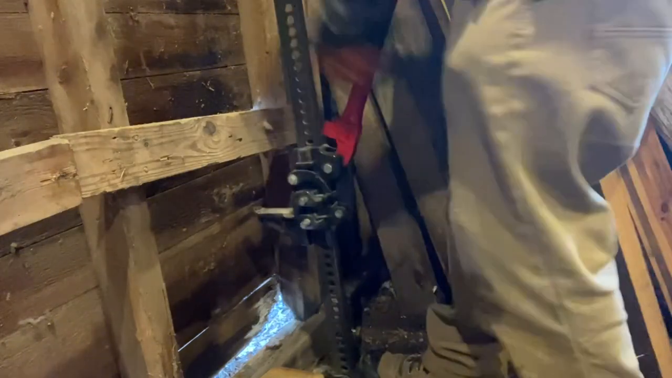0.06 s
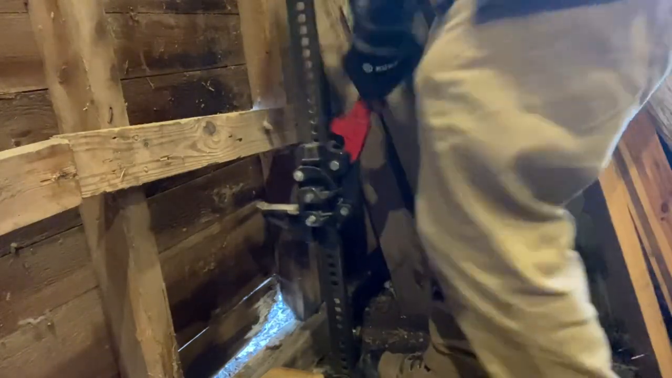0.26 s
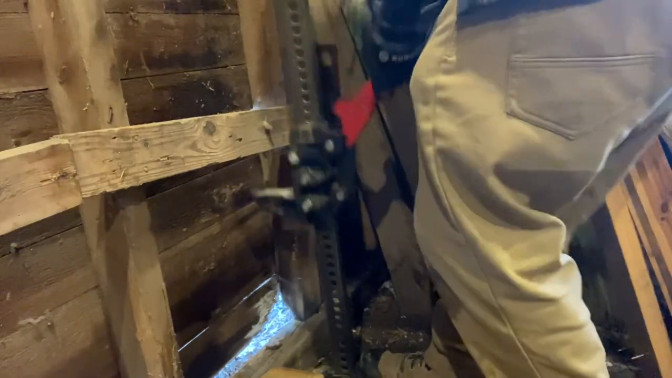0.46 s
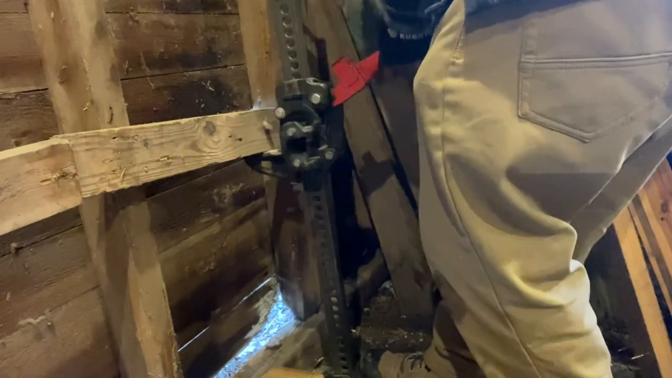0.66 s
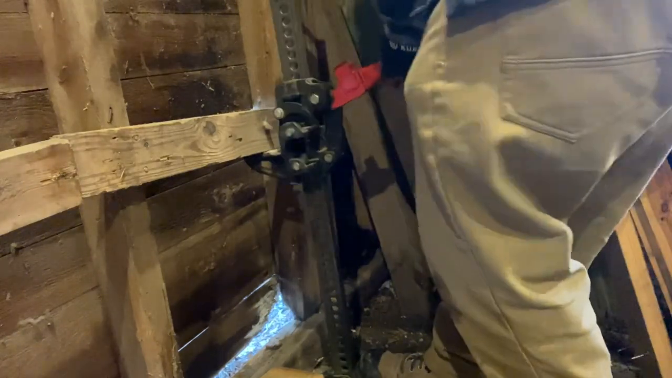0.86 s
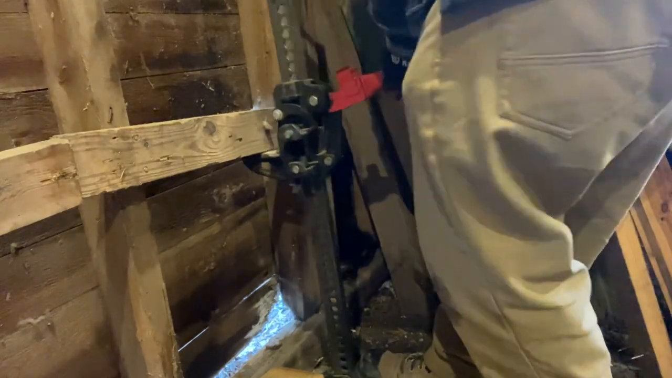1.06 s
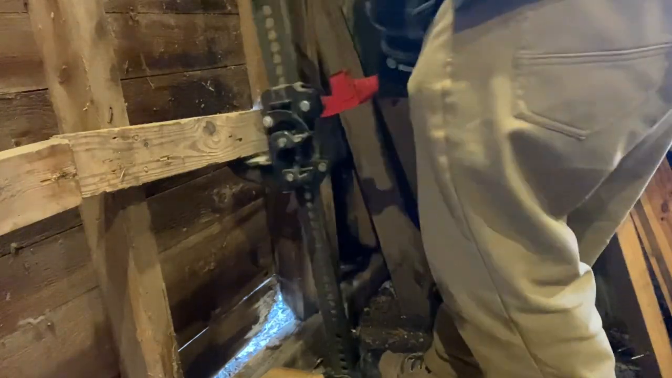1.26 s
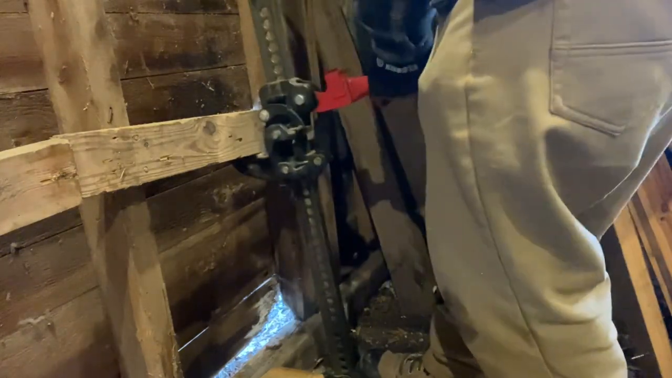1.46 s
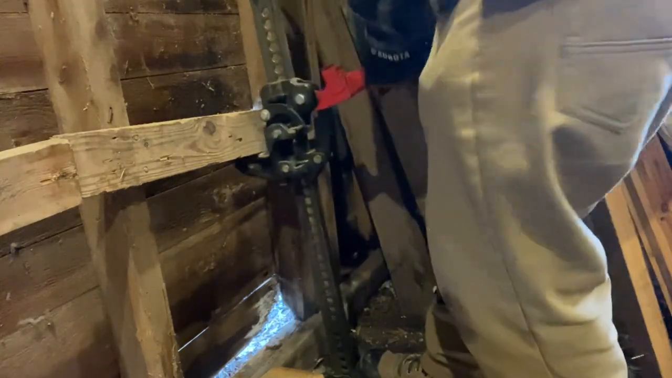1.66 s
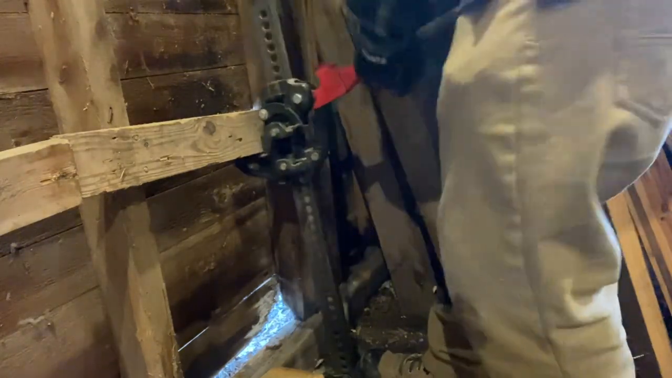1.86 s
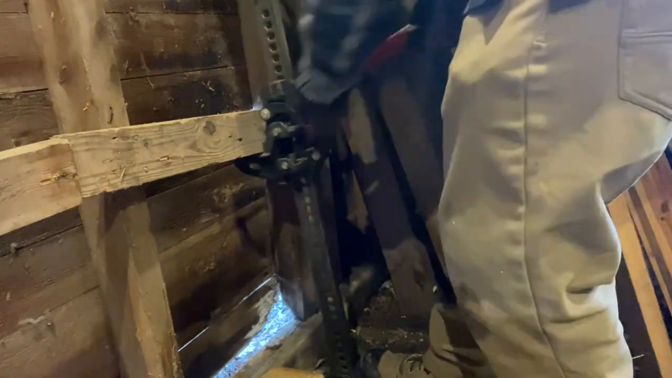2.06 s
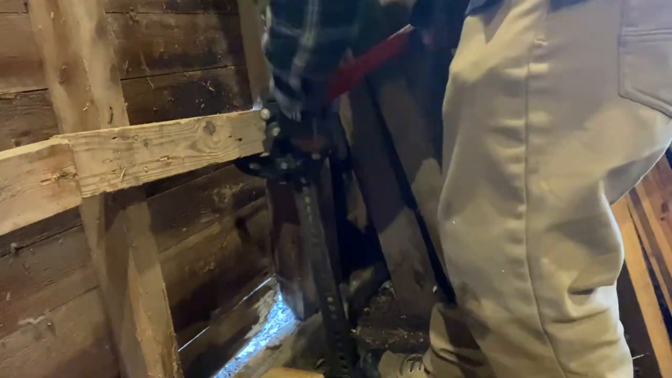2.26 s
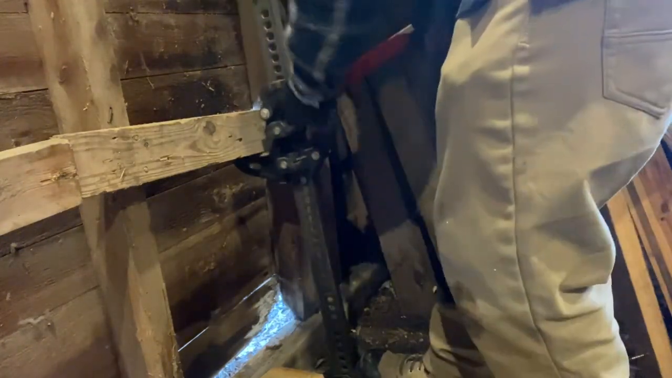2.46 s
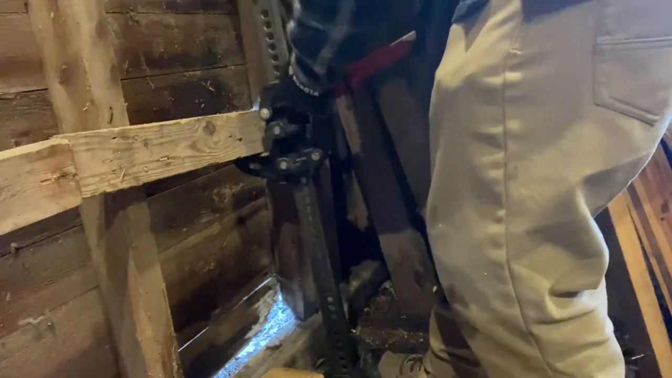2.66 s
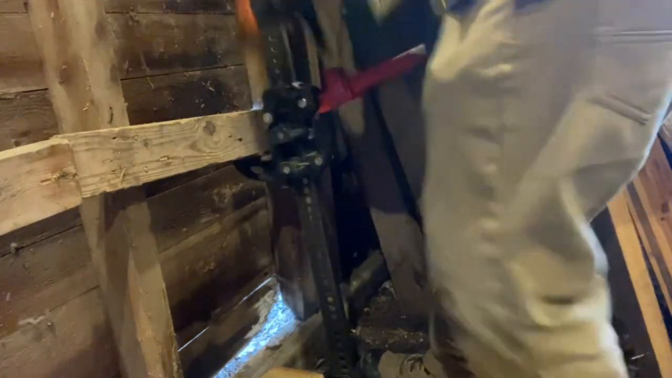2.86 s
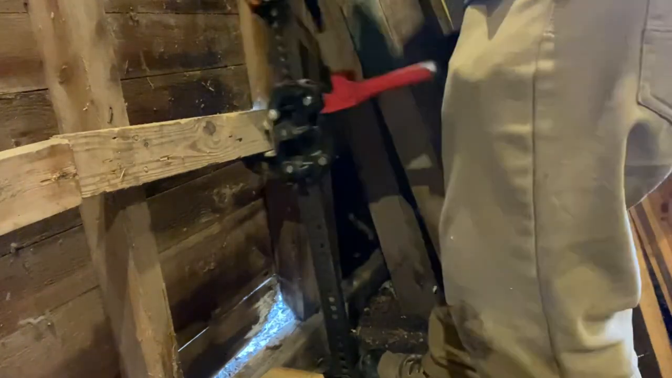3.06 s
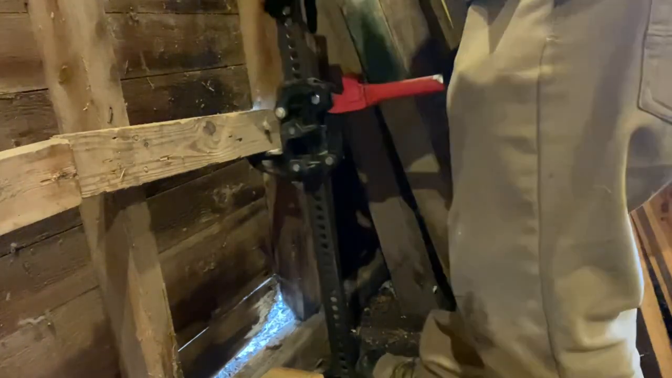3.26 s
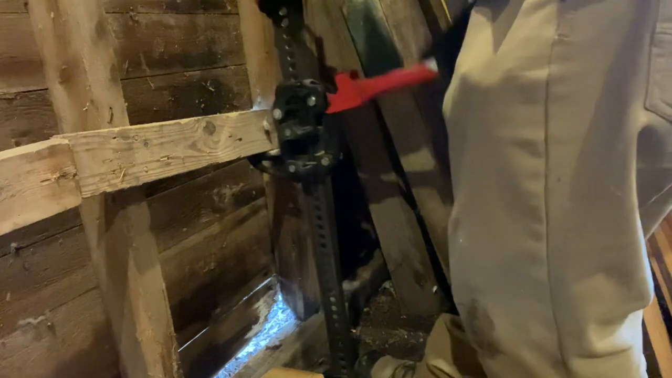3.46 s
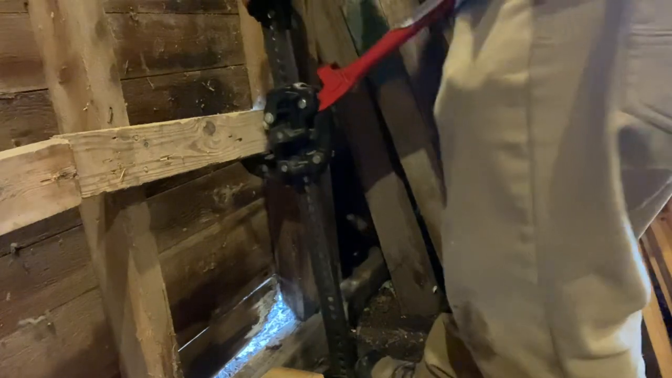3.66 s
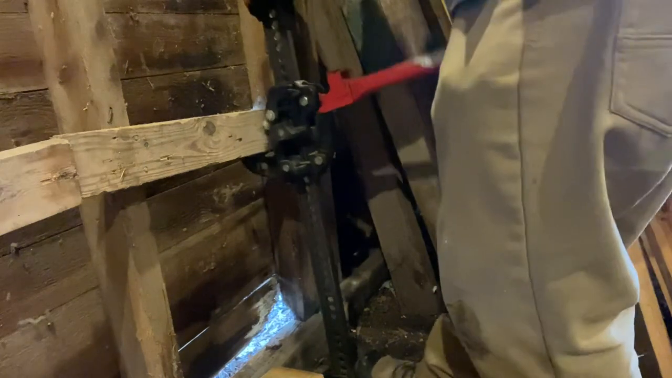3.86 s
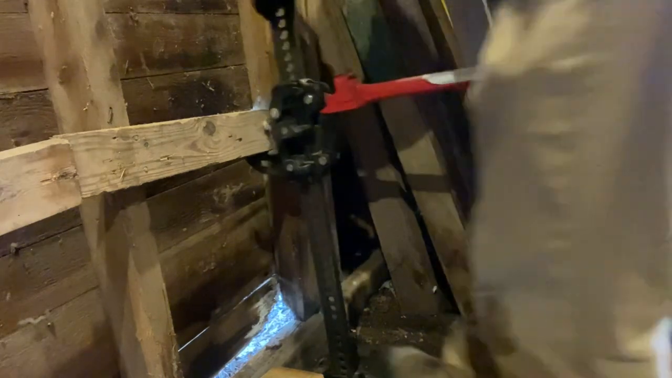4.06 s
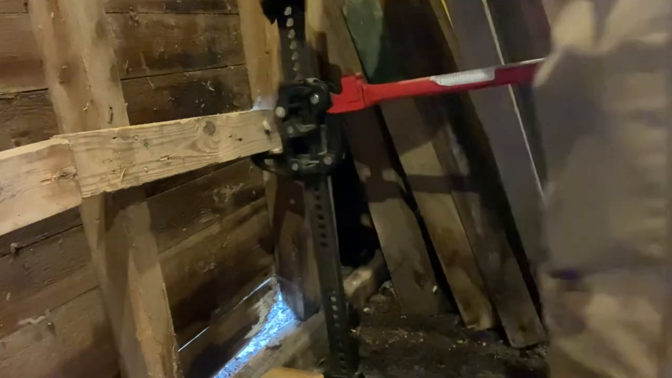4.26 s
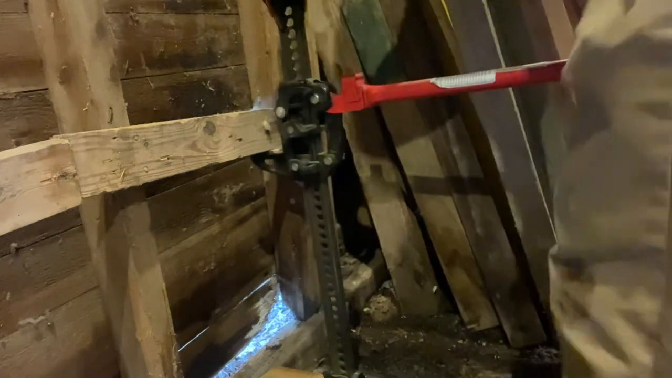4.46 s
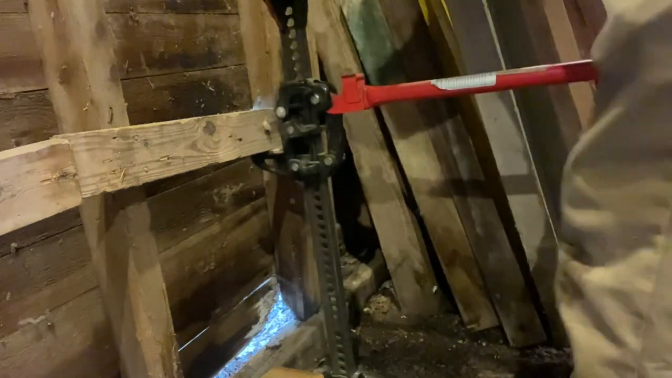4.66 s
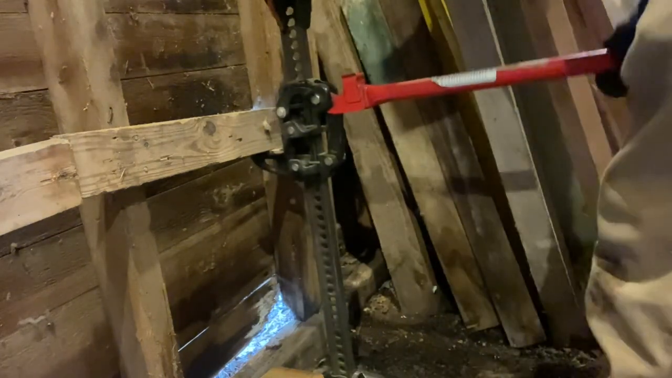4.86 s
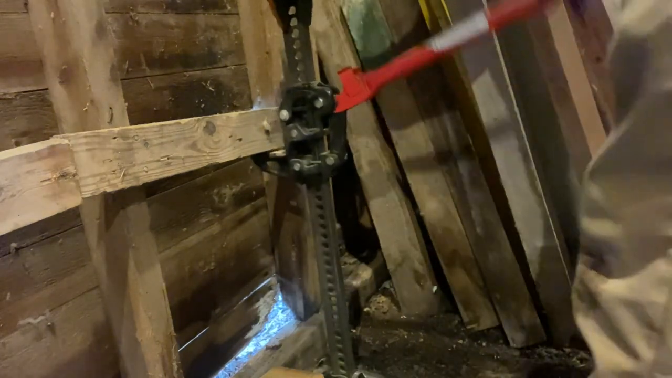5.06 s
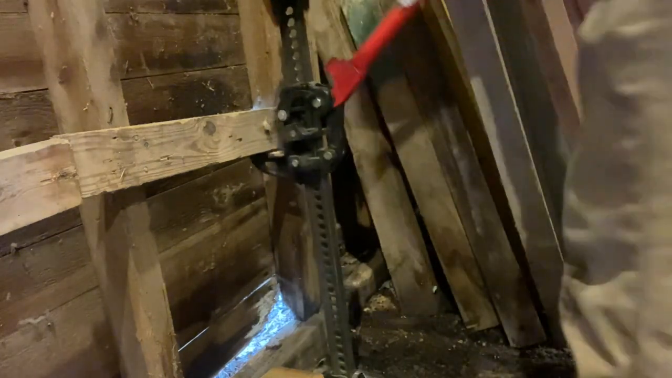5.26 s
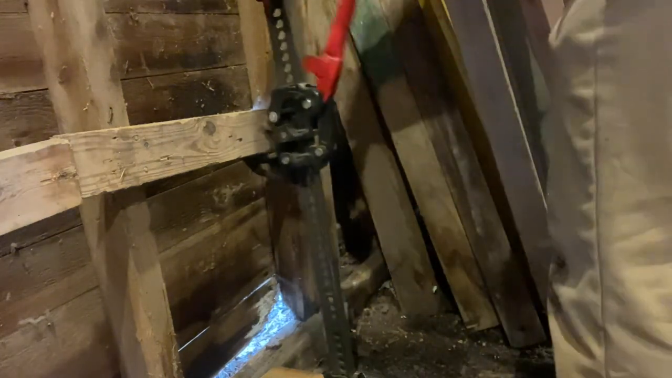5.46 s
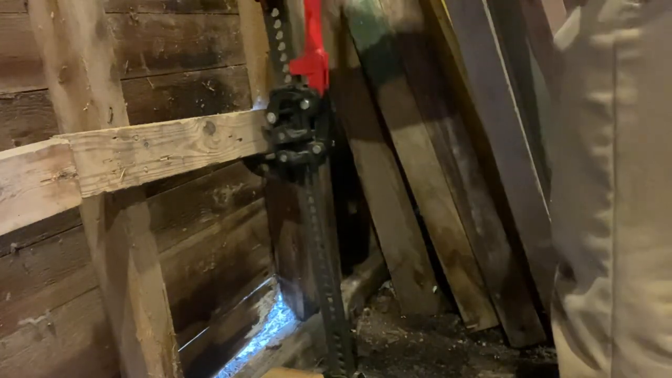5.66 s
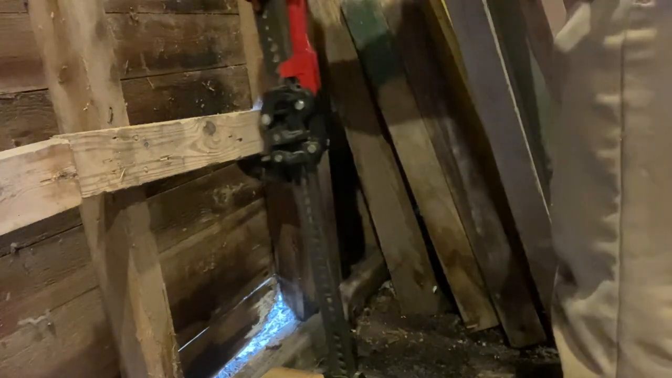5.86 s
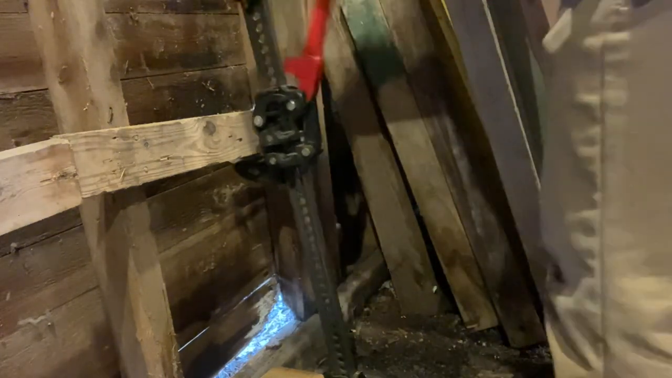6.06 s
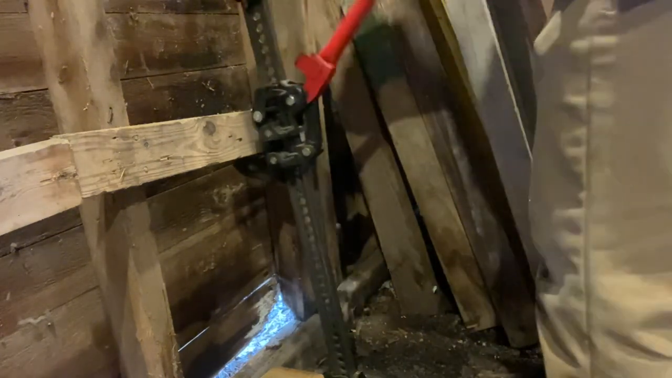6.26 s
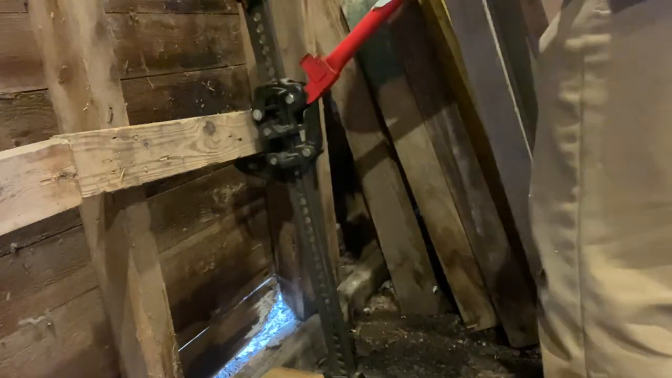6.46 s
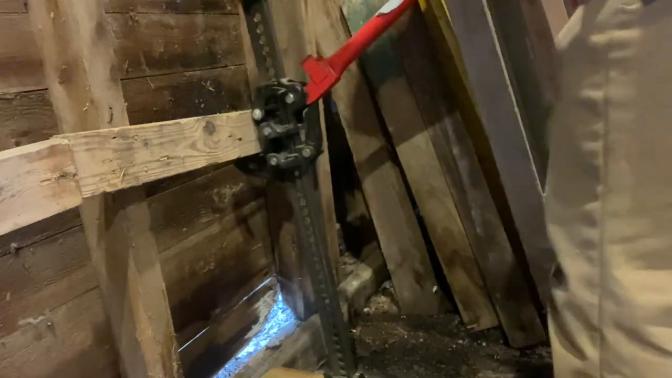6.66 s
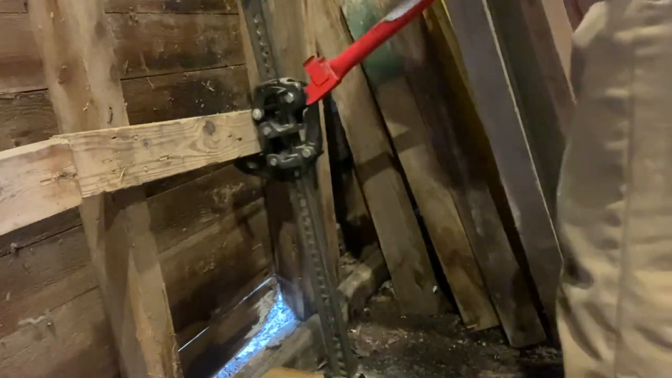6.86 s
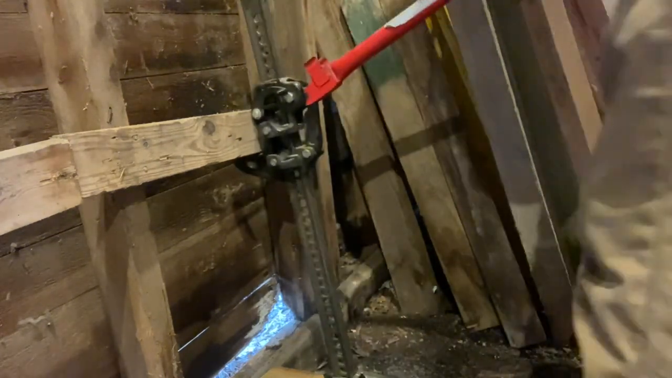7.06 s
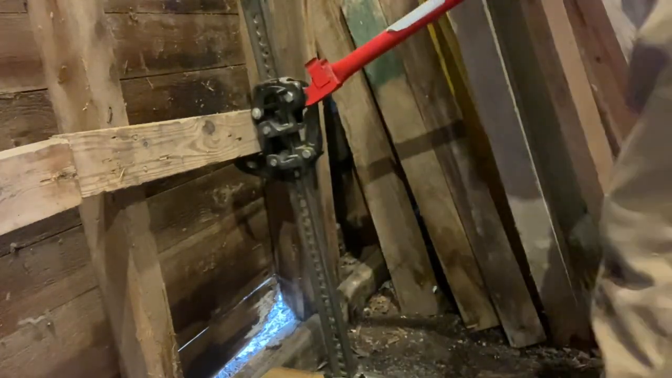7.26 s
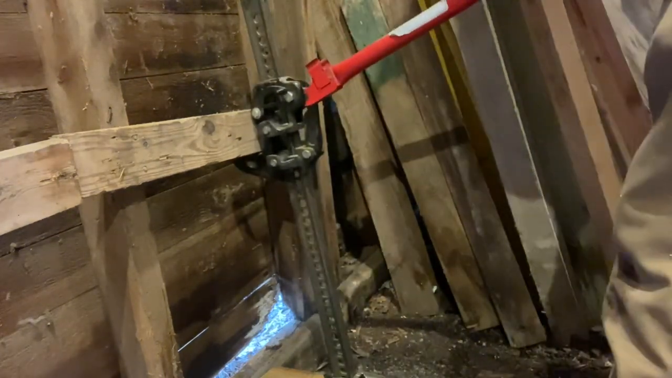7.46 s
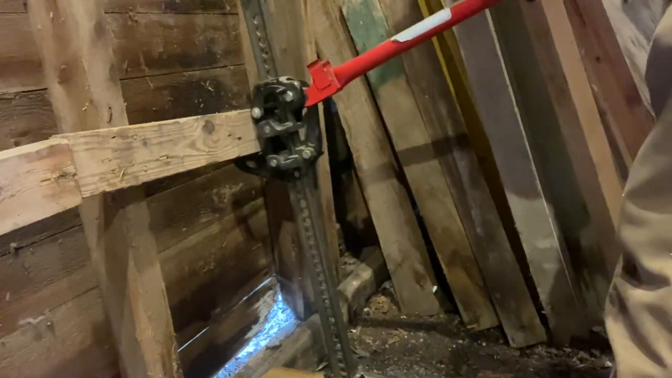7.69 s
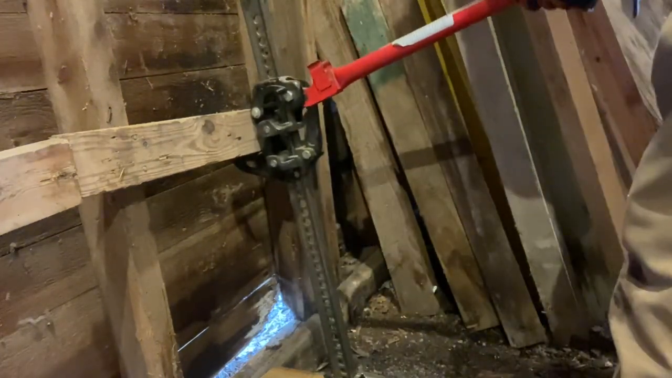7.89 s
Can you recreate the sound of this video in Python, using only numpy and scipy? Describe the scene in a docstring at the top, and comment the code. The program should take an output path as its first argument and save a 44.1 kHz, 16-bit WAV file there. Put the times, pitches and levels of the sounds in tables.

```python
"""A farm jack is worked against a beam in an old timber barn, close to the microphone.
Over a low drone and the stir of clothes, knocks, rattle and clacks lead into hard steel blows and a thump on the
planks within the first second; a pin pings. Later come a second, shorter ping, more clacks, creaking timber and
scuffs, a hum that swells midway, more blows and the last clanks. Steel and wood are shaped noise bursts with
dying sines, rubbing is grainy noise, the floor is sines and low noise, and the barn adds a short noise tail."""
import sys
import numpy as np
from scipy import signal
from scipy.fft import irfft
from scipy.io import wavfile
from scipy.ndimage import uniform_filter1d

SR = 44100
rng = np.random.default_rng(int(sys.argv[2]) if len(sys.argv) > 2 else 0)


def persist_wave(psi):
    """Save psi, clipped to +-1, as 16-bit WAV."""
    counts = np.round(np.clip(psi, -1, 1) * 32767).astype(np.int16)
    wavfile.write(sys.argv[1], SR, np.atleast_2d(counts).T)


N = 349713  # length in samples


def amp(db):
    """Decibels to amplitude."""
    return np.exp(np.asarray(db) * np.log(10) / 20)


def evened(x):
    """Scales a sound to an RMS of 1."""
    return x / np.sqrt(np.mean(x ** 2) + 1e-20)


def read(points, hz):
    """Reads a curve of (Hz, value) points along a logarithmic pitch axis."""
    f, value = np.transpose(points)
    return np.interp(np.log(hz + 1), np.log(f + 1), value)


def glide(points, t):
    """Reads a curve of (seconds, value) points over time."""
    return np.interp(t, *np.transpose(points))


def swell_in(t, rise_s):
    """A soft onset that closes in on full level."""
    return 1 - np.exp(-t / rise_s)


def add(mix, s, sound):
    """Lays a sound into the mix from second s, cut off at the end of the mix."""
    part = mix[:, max(round(s * SR), 0):][:, :sound.shape[-1]]
    part += sound[..., :part.shape[1]]


def bandpass(x, lo_hz, hi_hz, order=3):
    """Keeps the band between two frequencies."""
    edges = [lo_hz, min(hi_hz, SR / 2 - 1)]
    return signal.sosfilt(signal.butter(order, edges, "band", fs=SR, output="sos"), x)


def colour(x, points):
    """Causal filter with the given spectrum, so that attacks stay sharp."""
    hz = abs(np.fft.fftfreq(4096, 1 / SR))
    log_gain = np.log(amp(read(points, hz)))
    taps = np.fft.ifft(np.exp(np.conj(signal.hilbert(log_gain)))).real
    return signal.oaconvolve(x, taps[None, :len(hz) // 2], axes=1)[:, :N]


# How alike left and right are. Each row: frequency in Hz, likeness (1 is identical).
LIKENESS = [(60, 0.94), (150, 1), (500, 0.24), (1100, 0.44), (2200, 0.41), (4000, .15), (8000, 0.13),
            (13000, 0.29)]


def noise(size, spectrum=((1, 0), (2, 0))):
    """Two channels of noise, nearly alike in the bass and looser above; flat unless given a spectrum."""
    hz = np.fft.rfftfreq(size, 1 / SR)
    mid, side = np.exp(2j * np.pi * rng.random((2, len(hz))))
    same = np.clip(read(LIKENESS, hz), -1, 1)
    mid, side = mid * np.sqrt(1 + same), side * np.sqrt(1 - same)
    return evened(irfft(np.array([mid + side, mid - side]) * amp(read(spectrum, hz)), size))


def ring(modes, t):
    """Dying sines from (Hz, dB, t60 s); the less alike the channels at a pitch, the wider their phases part."""
    def mode(hz):
        angle = np.arccos(np.clip(read(LIKENESS, hz), -1, 1))
        apart = angle * np.array([[.5], [-.5]]) * rng.choice([-1, 1])
        return np.sin(2 * np.pi * (hz * t + rng.random()) + apart)
    return sum(amp(db - 60 * t / t60) * mode(hz) for hz, db, t60 in modes)


def centred(x, side_db):
    """Sets the level of the left-right difference: below 0 dB draws in, above 0 dB widens."""
    mid = x.mean(0)
    return mid + amp(side_db) * (x - mid)


# Low, middle, high and top band of a blow. Each row: lower edge in Hz, upper edge in Hz.
BAND_EDGES = [(180, 700), (700, 3000), (3000, 9000), (9000, 14300)]


def blows(rows, band_db, band_decay, band_rise_s, band_side_db):
    """Each contact is a chatter of tiny collisions in four bands, each with its own swell, decay and width."""
    out, t = np.zeros((2, N)), np.arange(8192) / SR
    bands = [signal.butter(3, edges, "band", fs=SR, output="sos") for edges in BAND_EDGES]
    for s, db, low_db, high_db, top_db, t60 in rows:
        unevenness = evened(uniform_filter1d(rng.standard_normal(len(t)), size=40))
        chatter = noise(len(t)) * amp(1.4 * unevenness)
        levels_db = np.add([low_db, 0, high_db, top_db], band_db)
        for band, level_db, decay, rise, side_db in zip(bands, levels_db, band_decay, band_rise_s, band_side_db):
            fade = amp(-60 * t / max(t60 * decay, 1 / SR))
            shape = fade * (1 - np.exp(-(t / rise) ** 2)) + 1e-9
            crack = evened(signal.sosfilt(band, centred(chatter, side_db) * shape))
            crack = crack * np.sqrt(np.mean(shape ** 2)) / shape.max()  # a longer shape carries more energy
            add(out, s, amp(db + level_db) * crack)
    return out


def tick(note_hz):
    """One dry, woody contact: a short noise burst around its own note, with a peak of 1."""
    t = np.arange(2048) / SR
    burst = noise(len(t)) * amp(-60 * t / 0.016) * swell_in(t, 0.00053)
    contact = bandpass(burst, .6 * note_hz, 1.5 * note_hz)
    return contact / abs(contact).max()


# The faint hum before its swell. Each row: pitch in Hz, level in dB.
HUM = [(97, -53.5)]
# The hum grows louder. Each row: time in seconds, gain in dB.
HUM_SWELL = [(4.4, -6.5), (5.4, 4)]
# Spectrum of the drone. Each row: frequency in Hz, relative level in dB.
DRONE = [(12, -27.5), (25, -12), (40, -8.5), (55, -2), (75, 0), (100, 1), (150, -13.5), (250, -20),
         (500, -32.5), (900, -70.5)]
DRONE_DB = -51.5


def rumble():
    """The low drone of the building as bass noise, with a faint sine hum in it."""
    t = np.arange(N) / SR
    hum = sum(amp(db) * np.sin(2 * np.pi * hz * t) for hz, db in HUM)
    return amp(glide(HUM_SWELL, t)) * hum + amp(DRONE_DB) * noise(N, DRONE)


# The light stir of clothes and straw. Each row: time in seconds, level in dB.
STIR = [(0, -48), (.18, -59), (.4, -50), (0.951, -63), (1.2, -57.5), (1.85, -57.5), (2.15, -64.5),
        (2.451, -56.5), (3.05, -54.5), (4.6, -57), (4.85, -60.5), (5.3, -56.5), (5.55, -62), (6.201, -51.5),
        (6.48, -64.5), (6.649, -57.5), (7.93, -51.5)]
# Spectrum of rubbing soles. Each row: frequency in Hz, relative level in dB.
SCRAPE = [(100, -20.5), (200, -1.5), (320, -2.5), (600, -2.5), (950, -12.5), (1900, -15), (3200, -26.5),
          (5000, -25), (9000, -67.5)]
# Spectrum of cloth. Each row: frequency in Hz, relative level in dB.
SWISH = [(1400, -30), (2500, 2), (4500, -4), (8600, -0.5), (9700, -11.5), (10700, -30), (12000, -8),
         (13800, -17.5), (15500, -44.5)]
STIR_HISS_DB = -13  # cloth hiss against the stir


def stir():
    """A soft, smooth noise rustle between the strokes, with the hiss of cloth riding on it."""
    level = amp(glide(STIR, np.arange(N) / SR))
    return level * (noise(N, SCRAPE) + amp(STIR_HISS_DB) * noise(N, SWISH))


TICKS_PER_S, TICK_DB = 8.3, 9  # how often, and how far the smallest tick's peak stands above the stir


def stray_ticks(note_hz, spread, size_db):
    """Sparse, faint ticks of grit and gear at random moments, growing with the stir."""
    out = np.zeros((2, N))
    for when, size, pitch in rng.random((round(TICKS_PER_S * N / SR), 3)):
        s = when * N / SR
        db = glide(STIR, s) + TICK_DB + size_db * size
        add(out, s, amp(db) * tick(note_hz * np.exp(spread * (2 * pitch - 1))))
    return out


# Loose parts and timber knocking.
# Each row: start in seconds, level in dB, note in Hz, high band in dB against the middle band before band trims.
KNOCKS = [(0.236, -23, 732, -18.5), (0.268, -28.5, 1060, -19), (0.333, -22, 1117, -21),
          (0.65, -5.5, 1760, -12.5), (0.668, -13, 1150, -12.5), (1.153, -29, 472, -15.5),
          (1.424, -19.5, 1580, -6.5), (2.371, -24.5, 1400, -11.5), (2.448, -34, 304, -25),
          (2.5, -35.5, 330, -20.5), (3.136, -32, 290, -24), (3.264, -21.5, 635, -10),
          (3.437, -25, 1105, -18), (3.524, -31.5, 1010, -7.5), (3.934, -28, 630, -12),
          (4.283, -25, 314, -2.5), (4.979, -37.5, 2080, -10), (5.07, -23.5, 789, -16),
          (5.788, -18.5, 1913, -10), (5.9, -30, 1120, -5.5), (6.028, -21, 1430, -14),
          (6.281, -19.5, 421, -25.5), (6.293, -27.5, 877, -17.5), (6.826, -28, 870, -6),
          (6.977, -23.5, 649, -10), (7.047, -41.5, 895, 8), (7.109, -19.5, 601, -8),
          (7.445, -17.5, 1290, -10.5), (7.618, -21, 1590, -8), (7.726, -23.5, 800, -6.5),
          (7.799, -21.5, 628, -21), (7.891, -34, 1160, -10)]
# Spectrum of knocked timber. Each row: frequency in Hz, relative level in dB.
TIMBER = [(200, 6.5), (450, 6), (750, 4.5), (1200, 0), (2000, -0.5), (3000, -6), (6000, -6), (9500, -16.5),
          (10500, -23), (13000, 3.5), (15000, -7.5)]
KNOCK_T60_S = 0.034  # base decay, scaled per band and per note
# bigger, lower parts have more body: dB for a 1 kHz part before the band trim, and dB per octave of its note
KNOCK_BODY_DB, KNOCK_BODY_DB_PER_OCTAVE = -14, -8.5
KNOCK_NOTE_DB = -9.5  # a part's own note against its knock


def knocks():
    """Lighter contacts, damped by the wood; each loose part has its own short note, the low ones lasting longer."""
    rows = []
    for s, db, hz, high_db in KNOCKS:
        body_db = KNOCK_BODY_DB + KNOCK_BODY_DB_PER_OCTAVE * np.log2(hz / 1000)
        rows.append((s, db, body_db, high_db, high_db - 22.5, KNOCK_T60_S))
    contacts = blows(rows, band_db=[-5.5, -6.5, -2.5, -8.5], band_decay=[1.5, 0.45, 2.6, .3],
                     band_rise_s=[0.00067, 0.0021, 0.0005, 0.001], band_side_db=[-4.0, -1.5, -1.7, 0.9])
    out = colour(contacts, TIMBER)
    t = np.arange(4096) / SR
    for s, db, hz, _ in KNOCKS:
        note_t60 = 1.8 * KNOCK_T60_S * (hz / 1000) ** -.4
        note = ring([(hz, db + KNOCK_NOTE_DB, note_t60)], t)
        add(out, s, note * swell_in(t, 0.00047))
    return out


# Loose parts chattering while they move.
# Each row: start in seconds, end in seconds, base level in dB, typical note in Hz.
RATTLES = [(0.301, 0.604, -40.5, 1440), (1.362, 1.419, -43, 1420), (2.407, 2.543, -45, 1680),
           (2.74, 2.836, -50, 1170), (2.845, 3.002, -49, 970), (3.137, 3.296, -35.5, 605),
           (4.3, 4.367, -22, 570)]


def rattle(contacts_per_s, size_db, spread):
    """Small contacts of uneven size and pitch at random moments while loose parts move."""
    out = np.zeros((2, N))
    for start, end, base_db, hz in RATTLES:
        for when, size, pitch in rng.random((round(abs(end - start) * contacts_per_s), 3)):
            db = base_db + 2.5 + size_db * (2 * size - 1)
            contact = tick(hz * np.exp(spread * (2 * pitch - 1)))
            add(out, start + when * (end - start), amp(db) * contact)
    return out


# Slack in the handle's pivots clacking over. Each row: start in seconds, level in dB, strongest pitch in Hz.
CLACKS = [(0.317, -38, 1700), (0.387, -33, 1500), (0.413, -35, 1300), (1.066, -42.5, 1253),
          (1.116, -37, 1490), (1.139, -34, 1710), (2.35, -37, 1750), (2.415, -29.5, 1500),
          (2.449, -25, 2100), (2.463, -27, 1670), (2.731, -12, 1950), (2.811, -29, 990),
          (2.97, -38.5, 1090), (3.419, -22.5, 1150), (3.437, -25.5, 1750), (3.503, -38, 1710),
          (3.528, -35, 1410), (3.74, -38, 1300), (3.767, -31, 815), (3.798, -23, 1240), (3.85, -30, 1085),
          (3.909, -24.5, 1180), (4.284, -26, 890), (4.41, -36.5, 2300), (5.072, -21, 760),
          (5.099, -34, 1090), (5.132, -33.5, 1730), (5.566, -44, 900), (5.639, -22.5, 2300),
          (5.753, -13, 680), (5.889, -24.5, 1300), (5.918, -34.5, 1210), (6.031, -28, 1600),
          (6.066, -23, 1230), (6.14, -36, 1710)]
# What the linkage rings with. Each row: nominal pitch in Hz, relative level in dB, t60 in seconds.
LINK_MODES = [(750, 4.5, .035), (1120, 3, 0.1), (1390, -7, 0.035), (1770, -1, 0.045), (2340, -5, .03)]
CLACK_DB_PER_OCTAVE = -7.5  # modes fall away from a clack's strongest pitch
# the rough scrunch of the rusty faces as they meet: noise level before its band filter, and its decay
SCRUNCH_DB, SCRUNCH_T60_S = 1.5, 0.04


def clacks():
    """Play in the pivots closes with a dull, hollow clack: a rough scrunch over a few short modes."""
    out, t = np.zeros((2, N)), np.arange(6144) / SR
    for s, db, strongest_hz in CLACKS:
        hump = [(hz, CLACK_DB_PER_OCTAVE * abs(np.log2(hz / strongest_hz))) for hz in (100, strongest_hz, 10000)]
        # each clack's modes are detuned a little at random
        modes = [(hz * (1 + rng.uniform(-0.0988, 0.13)), mode_db + read(hump, hz), t60)
                 for hz, mode_db, t60 in LINK_MODES]
        grating = noise(len(t), hump) * amp(SCRUNCH_DB - 60 * t / SCRUNCH_T60_S)
        scrunch = bandpass(grating, 470, 2700, order=7)
        add(out, s, amp(db) * (scrunch + amp(-9) * ring(modes, t)) * swell_in(t, 0.0019))
    return out


def friction(spectrum, grains_per_s, grain_db):
    """Fine hiss with tiny slips of uneven size scattered through it."""
    sizes = amp(3.1 * np.minimum(rng.exponential(1, N), 4))
    slips = (rng.random(N) < grains_per_s / SR) * sizes
    grip = signal.lfilter([1], [1, -np.exp(-1 / (0.003 * SR))], slips)  # each slip fades over 3 ms
    return evened(colour(noise(N) * (1 + amp(grain_db) * evened(grip)), spectrum))


# Soles, cloth and carriage sliding.
# Each row: middle in seconds, scrape in dB before a common trim, swish in dB against it, length in seconds.
SCUFFS = [(0.383, -31, -31, 0.16), (0.514, -13.5, -19, 0.095), (0.606, -14.5, -20, 0.083),
          (1.36, -21, -10, 0.054), (1.43, -12, -30, 0.047), (1.793, -32.5, -20.5, 0.072),
          (1.901, -45, 12.5, 0.09), (2.486, -18.5, -5.5, 0.062), (2.761, -17.5, -23, 0.2),
          (3.203, -23.5, -11.5, 0.16), (4.139, -22.5, -11, 0.033), (4.341, -13.5, -11.5, 0.093),
          (4.71, -22, -14.5, 0.047), (5.089, -25, -7, 0.042), (6.014, -33, 5, 0.037),
          (6.294, -20, -30, 0.042)]


def sliding():
    """Grit under soles and carriage and the swish of heavy cloth, in strokes that swell and fade."""
    t, scrape, swish = np.arange(N) / SR, 0, 0
    for s, db, swish_db, length in SCUFFS:
        stroke = amp(db - 17.5) * np.exp(-(2 * (t - s) / length) ** 2)
        scrape = scrape + stroke
        swish = swish + amp(swish_db) * stroke
    grit = friction(SCRAPE, grains_per_s=240, grain_db=4.5)
    cloth = friction(SWISH, grains_per_s=70, grain_db=2.5)
    return scrape * grit + swish * cloth


BAR_DB, BAR_T60_S = -7.5, .034  # level against the crack, and decay at 4 kHz


def bar(x, count=140):
    """Every crack passes through the thicket of the long steel bar's close, short modes."""
    t = np.arange(4096) / SR
    pitches = rng.uniform(900, 10000, count)
    body = ring([(hz, 0, BAR_T60_S * (hz / 4000) ** -.3) for hz in pitches], t)
    resonance = signal.oaconvolve(x, body / np.linalg.norm(body[0]), axes=1)[:, :N]
    return amp(-2) * (x + amp(BAR_DB) * resonance)


# Steel on steel. Each row: start in seconds, level in dB, body (low band) and edge (high band) in dB against
# the middle band before band trims, base t60 in seconds that each band scales.
CLANKS = [(0.5, -8, -25.5, -6.5, 0.025), (0.599, -16.5, -20, -1, 0.062), (0.628, -10, -10.5, -3, 0.045),
          (0.642, -6, -15, -6, 0.055), (1.348, -15.5, -30.5, -14, 0.0071), (2.324, -29, -8.5, 2.5, 0.043),
          (2.428, -21.5, -9, -6.5, 0.045), (2.49, -13.5, -25, 6.5, 0.026), (2.651, -32, -10, -7.5, 0.033),
          (2.716, -18, -17.5, -4.5, 0.021), (2.728, -7.5, -23, -16.5, 0.024),
          (3.575, -18, -12.5, -16, 0.022), (3.906, -17, -16, -24, 0.0099), (5.638, -19, -21.5, 6, 0.01),
          (5.751, -2.5, -27.5, -15, 0.014), (5.767, -15.5, -22.5, -12, 0.031),
          (6.057, -16, -12, -19.5, 0.022), (6.747, -15, -9.5, -11.5, 0.012),
          (7.342, -12, -10.5, -1.5, 0.0099), (7.351, -13.5, -3, -10, 0.0048), (7.561, -4, -14.5, -3, 0.016)]
# Spectrum of struck steel. Each row: frequency in Hz, relative level in dB.
STEEL = [(200, 5.5), (340, 3.5), (600, 6.5), (850, -8), (1100, 4.5), (1450, -3), (1950, 1.5), (2800, -6),
         (4200, 2), (7000, 1.5), (9400, -0.5), (10300, -14.5), (12500, 0.5), (15000, -18)]
# What the jack rings with. Each row: pitch in Hz, level in dB, of which only the differences count.
JACK_MODES = [(339.1, -45.5), (1066, -50), (1976, -39.5), (2509, -57), (4054, -64), (4867, -77.5),
              (6078, -60.5)]
TOP_DB, TOP_PER_EDGE = -1, 1  # a hard edge also lifts the top octave: dB before the band trim, and dB per dB of edge
REBOUND_S, REBOUND_DB = 0.013, -13.5  # slack in the linkage strikes back, harder the more body a blow has
JACK_T60_S, JACK_T60_SLOPE = .19, -.4  # decay at 1 kHz, and its power of frequency
JACK_RING_DB = -29.5  # ring against the blow, before brightness and spread
STRIKE_SPREAD_DB = 2.5  # no two blows land on the same spot: each mode's level varies by this deviation


def jack():
    """Hard blows and their rebounds, after which the bar and handle ring briefly, the high modes dying first."""
    rows = []
    for s, db, low_db, high_db, t60 in CLANKS:
        top_db = TOP_DB + TOP_PER_EDGE * high_db
        rows.append((s, db, low_db, high_db, top_db, t60))
        rows.append((s + REBOUND_S, db + REBOUND_DB + low_db, low_db, high_db, top_db, t60))
    cracks = blows(rows, band_db=[-4.0, -6.0, -1.5, -4.0], band_decay=[4.7, 1.44, 1.1, 0.66],
                   band_rise_s=[0.0017, 0.0048, 0.00063, 0.00072], band_side_db=[-2.0, -4.5, 2.5, 3.5])
    ringing, t = np.zeros((2, N)), np.arange(12288) / SR
    loudest_db = max(db for hz, db in JACK_MODES)
    for s, db, low_db, high_db, _ in CLANKS:
        # a bright blow wakes the high modes
        brightness = [(350, low_db + 11.5), (1000, 0.0041), (2500, 0.013), (5000, high_db + 8.5)]
        modes = []
        for hz, mode_db in JACK_MODES:
            level_db = mode_db - loudest_db + read(brightness, hz) + STRIKE_SPREAD_DB * rng.standard_normal()
            modes.append((hz, level_db, JACK_T60_S * (hz / 1000) ** JACK_T60_SLOPE))
        add(ringing, s, amp(db + JACK_RING_DB) * ring(modes, t))
    return bar(colour(cracks, STEEL)) + ringing


# What the carriage rings with after a bright blow.
# Each row: nominal pitch in Hz, relative level in dB before spread, t60 in seconds.
CARRIAGE_MODES = [(2050, -6, 0.18), (2400, -7, 0.1), (3410, -5.5, 0.14), (5040, -4, 0.15)]
CARRIAGE_RING_DB = -32  # against the blow, before its edge is added


def carriage():
    """Bright blows leave the cast housing ringing, its pitches varying a little at random from blow to blow."""
    out, t = np.zeros((2, N)), np.arange(8192) / SR
    for s, db, _, high_db, _ in CLANKS:
        modes = [(hz * (1 + rng.uniform(-0.08, 0.05)), mode_db + STRIKE_SPREAD_DB * rng.standard_normal(), t60)
                 for hz, mode_db, t60 in CARRIAGE_MODES]
        add(out, s, amp(db + high_db + CARRIAGE_RING_DB) * ring(modes, t))
    return out


# A pin snapping home without load gives a short, hollow note.
# Each row: pitch in Hz, level in dB against an unloaded blow, t60 in seconds.
SNAP_MODES = [(1960, -5, 0.02), (2170, -14, 0.051)]
UNLOADED_BODY_DB = -21  # a blow with this little body carries no load


def snaps():
    """The less load a blow carries, the more freely the pin sounds its own note."""
    out, t = np.zeros((2, N)), np.arange(4096) / SR
    for s, db, low_db, *_ in CLANKS:
        freedom = np.clip(low_db / UNLOADED_BODY_DB, 0, 1) ** 2
        add(out, s, freedom * amp(db) * ring(SNAP_MODES, t) * swell_in(t, 0.000058))
    return out


# Weight landing on the plank floor. Each row: start in seconds, level in dB, pitch of the plank in Hz.
THUMPS = [(0.637, -9.5, 121.4), (0.646, -11.5, 55.4), (0.7, -10, 55.15), (1.421, -17, 98),
          (1.448, -20, 53.4), (2.439, -24, 73), (2.498, -25.5, 133.9), (2.736, -22, 65.5),
          (3.145, -17.5, 61.84), (3.234, -20.5, 62.7), (3.576, -29.5, 85.4), (4.149, -21, 72.6),
          (4.282, -25, 144), (4.703, -35, 59.9), (5.762, -26.5, 87.4), (6.03, -14, 73.5),
          (6.059, -29, 51.7), (6.241, -16, 63.1), (7.1, -30.5, 114), (7.335, -26, 154.3), (7.564, -28, 155),
          (7.577, -31, 89.7)]
PLANK_T60_S = 0.51  # for a 70 Hz plank
HOLLOW_DB, HOLLOW_DB_PER_OCTAVE = -15.5, 13  # short, high planks knock more hollowly: level at 100 Hz, and slope


def floorboards():
    """A load swings one plank, low ones longest, with a hollow knock above and an uneven sway of joists below."""
    out, t = np.zeros((2, N)), np.arange(32768) / SR
    for s, db, hz in THUMPS:
        plank = amp(-5.5 - 60 * t / (PLANK_T60_S * (hz / 70) ** -.6)) * np.sin(2 * np.pi * hz * t)
        neighbours = amp(-11 - 60 * t / PLANK_T60_S) * evened(bandpass(noise(len(t)), 48, 165, order=4))
        boom = (plank + neighbours) * swell_in(t, 0.00073)
        sway = amp(-14 - 60 * t / 1.07) * evened(bandpass(noise(len(t)), 48, 68))
        cavity = evened(bandpass(noise(len(t)), 230, 460))
        hollow_db = HOLLOW_DB + HOLLOW_DB_PER_OCTAVE * np.log2(hz / 100)
        hollow = amp(hollow_db - 60 * t / (0.52 * PLANK_T60_S)) * cavity * swell_in(t, 0.002)
        add(out, s, amp(db) * (boom + sway + hollow))
    return out


# Timber giving under the load. Each row: start in seconds, level in dB, note in Hz.
CREAKS = [(0.641, -9.5, 330), (0.95, -30.5, 453), (1.119, -27.5, 299), (1.836, -36.5, 814),
          (3.155, -22.5, 310), (3.245, -26, 319), (4.038, -36, 540), (4.284, -18, 327),
          (4.351, -25.5, 640.5), (4.526, -35.5, 696), (4.547, -44.5, 848), (4.573, -39.5, 436),
          (4.663, -34.5, 550), (4.706, -30, 544), (4.724, -34, 490), (4.884, -39.5, 422), (6.75, -25, 508),
          (7.351, -14, 606), (7.563, -27, 446), (7.575, -22.5, 256), (7.63, -27, 246)]
CREAK_T60_S = 0.068


def creaks():
    """Loaded timber slips with a small, dull crack of noise around one dying note."""
    out, t = np.zeros((2, N)), np.arange(6144) / SR
    for s, db, hz in CREAKS:
        crack = bandpass(noise(len(t)) * amp(-60 * t / CREAK_T60_S), .65 * hz, 1.5 * hz)
        note = ring([(hz, -8, CREAK_T60_S)], t) * swell_in(t, 0.00098)
        add(out, s, amp(db) * (crack / abs(crack).max() + note))
    return out


# The climbing pin springing free. Each row: start in seconds, level in dB, share of its free ringing time.
PINGS = [(0.693, -13, 0.98), (2.491, -18.5, .3)]
# What the pin rings with. Each row: pitch in Hz at a share of 1, relative level in dB, free t60 in seconds.
PIN_MODES = [(6440, 1.5, 0.067), (6580, -18.5, 0.22), (9530, 1, 0.036), (8950, -11.5, .035),
             (7950, -6.5, 0.019)]


def pin():
    """A short, hard pin snaps and rings; a smaller share squeezes time, so the ring is shorter and higher."""
    out, t = np.zeros((2, N)), np.arange(SR // 2) / SR
    for s, db, share in PINGS:
        snap = amp(-1 - 60 * t / .03) * evened(bandpass(noise(len(t)), 2500, 11000, order=2))
        add(out, s, amp(db) * (ring(PIN_MODES, t / share) + snap) * swell_in(t, 0.00087))
    return out


# Steel parts set ringing on one note. Each row: start in seconds, level in dB, pitch in Hz, t60 in seconds.
TINKS = [(1.349, -18, 2122, 0.021), (2.495, -24, 323, 0.13), (2.495, -31, 460, .3),
         (2.652, -27.5, 5010, 0.026), (2.66, -21, 1310, 0.016), (2.731, -14, 1961, 0.068),
         (5.638, -19.5, 12000, 0.022), (5.639, -19, 5120, 0.031), (5.639, -30.5, 2050, 0.11),
         (5.752, -19.5, 1063, 0.12), (5.751, -23, 1908, 0.14), (7.448, -25, 1297, 0.077),
         (7.562, -41.5, 2082, 0.79)]


def tinks():
    """Pins, springs, washers and the handle each sound one brief dying sine when they are jolted."""
    out, t = np.zeros((2, N)), np.arange(12288) / SR
    for s, db, hz, t60 in TINKS:
        add(out, s, ring([(hz, db, t60)], t) * swell_in(t, 0.00035))
    return out


# The barn's tail. Each row: frequency in Hz, t60 in seconds.
BARN = [(100, 0.95), (400, 0.38), (1500, 0.3), (5000, 0.33), (9000, 0.11), (14000, 0.04)]


def barn(x):
    """A dense noise tail from the timber walls, the bass lasting longest and the top octaves dying first."""
    hz, t, z = signal.stft(noise(SR), SR, nperseg=256)
    fade = amp(-60 * t / read(BARN, hz)[:, None])
    tail = signal.istft(z * fade, SR, nperseg=256)[1]
    tail *= 1 - np.exp(-(np.arange(tail.shape[1]) / SR / 0.00067) ** 2)
    return signal.fftconvolve(x, tail / np.linalg.norm(tail[0]), axes=1)[:, :N]


def scene():
    """Jack and boots close by, the barn's tail around them, the floor booming below, all slightly to the left."""
    steel = jack() + carriage() + snaps() + tinks() + clacks()
    wood = knocks() + creaks() + rattle(contacts_per_s=71, size_db=6.5, spread=0.33)
    wood = wood + stray_ticks(note_hz=750, spread=1.0, size_db=8.0)
    ping, rubbing = pin(), sliding()
    room = barn(amp(-12.5) * steel + amp(-9.0) * wood + amp(-17.0) * ping + amp(-10.5) * rubbing)
    near = (steel + wood + ping + room + rubbing + stir()) * amp([[.7], [-.7]])
    return near + (floorboards() + rumble()) * amp([[1.3], [-1.3]])


CUTOFF_HZ = 15200


def record(dry):
    """Peaks round off at full scale; then a low-pass sets the band limit."""
    lowpass = signal.firwin(201, CUTOFF_HZ, window=("kaiser", 9), fs=SR)
    return signal.oaconvolve(np.tanh(dry), lowpass[None], "same")


dry = scene()
out = record(dry)
persist_wave(out)
```